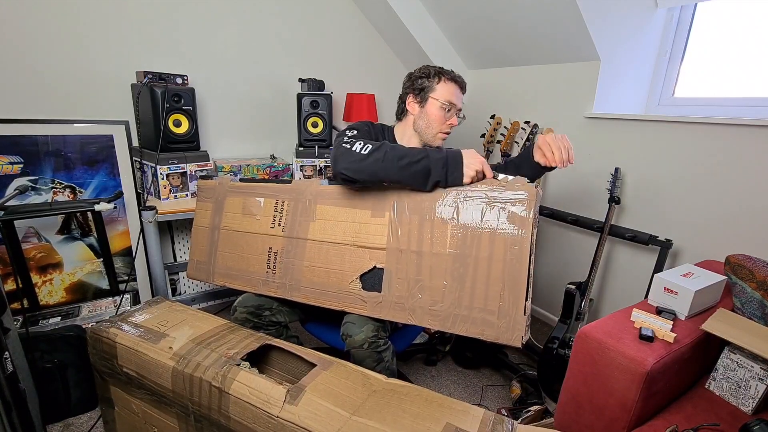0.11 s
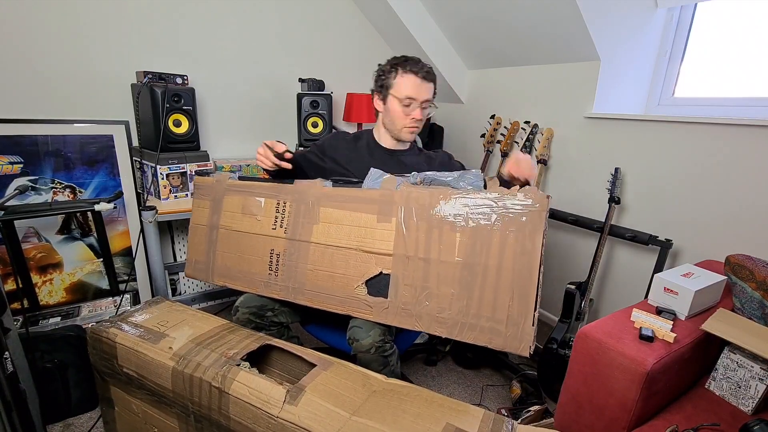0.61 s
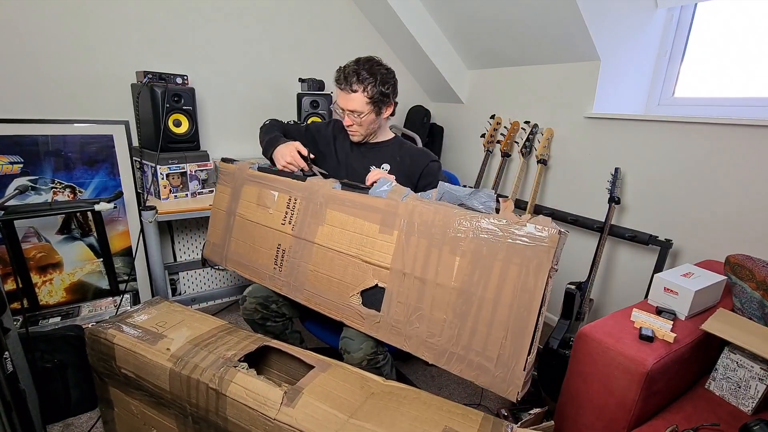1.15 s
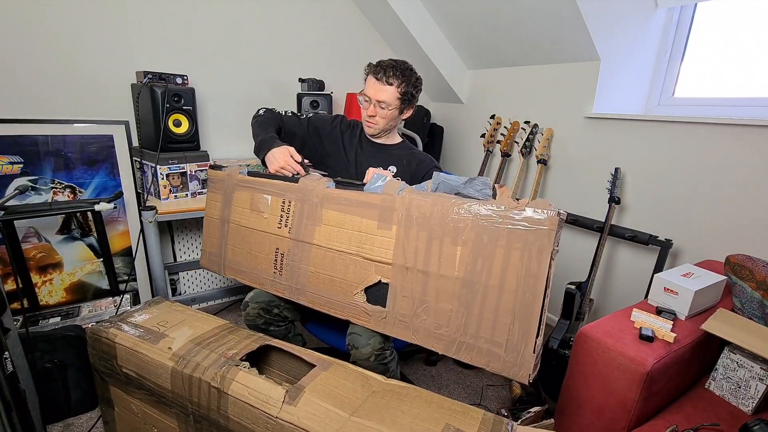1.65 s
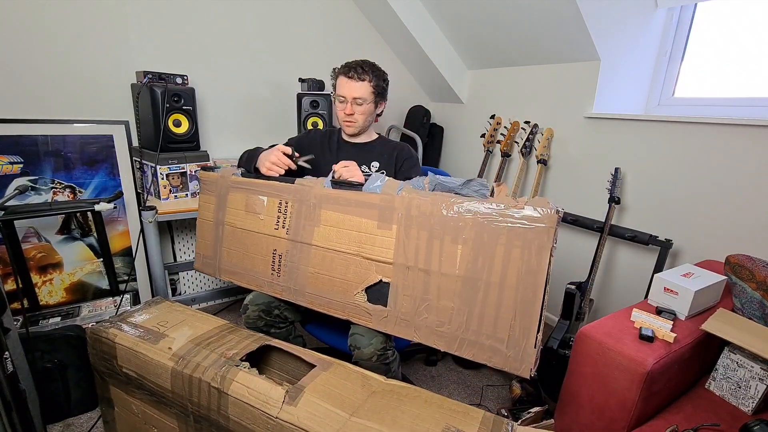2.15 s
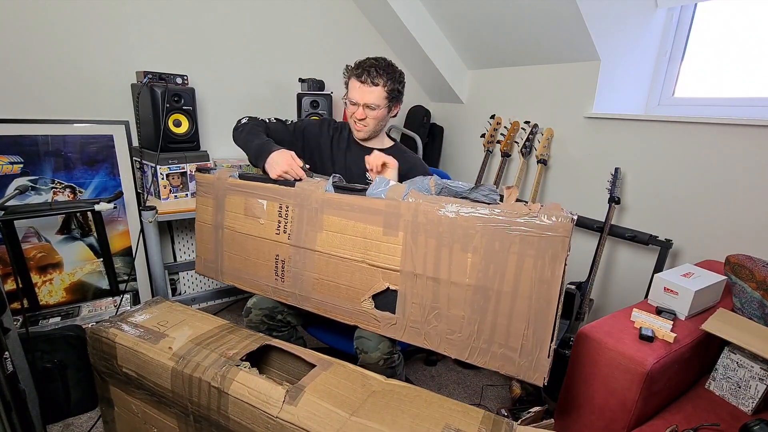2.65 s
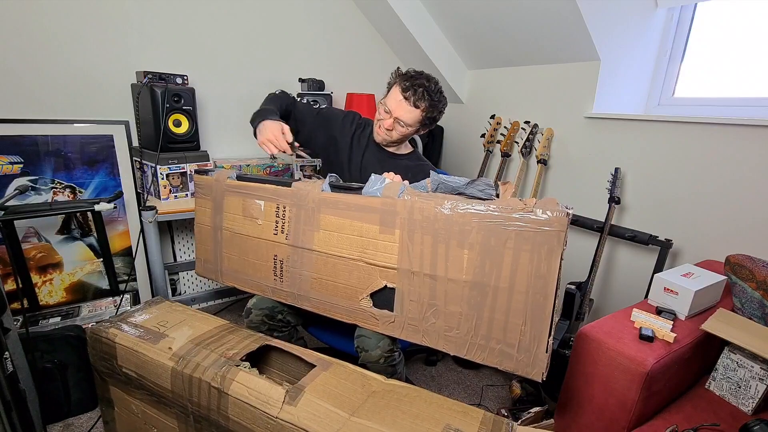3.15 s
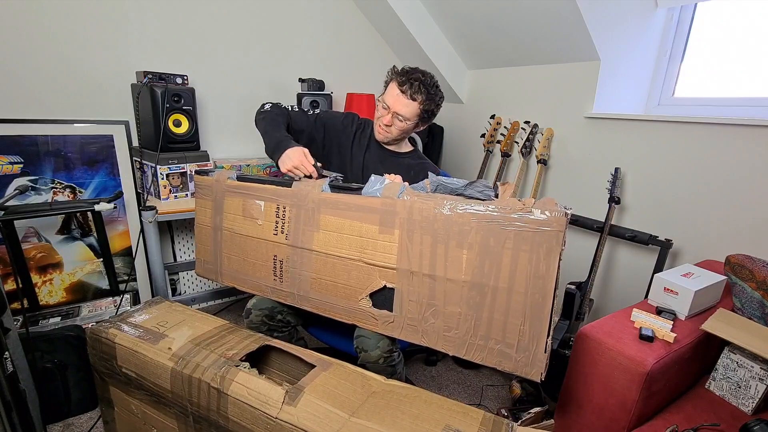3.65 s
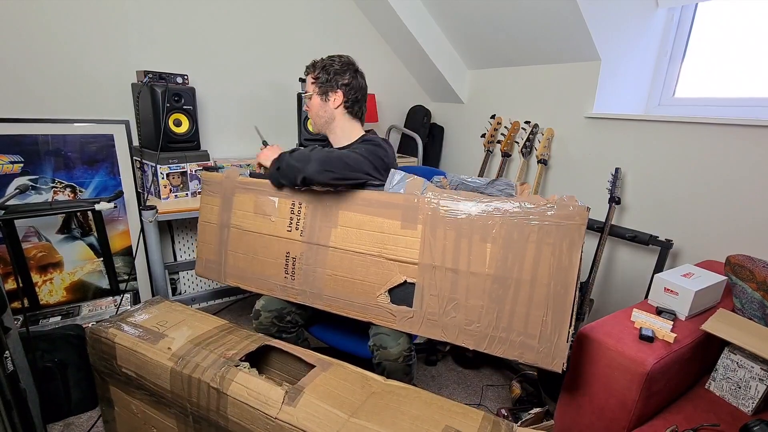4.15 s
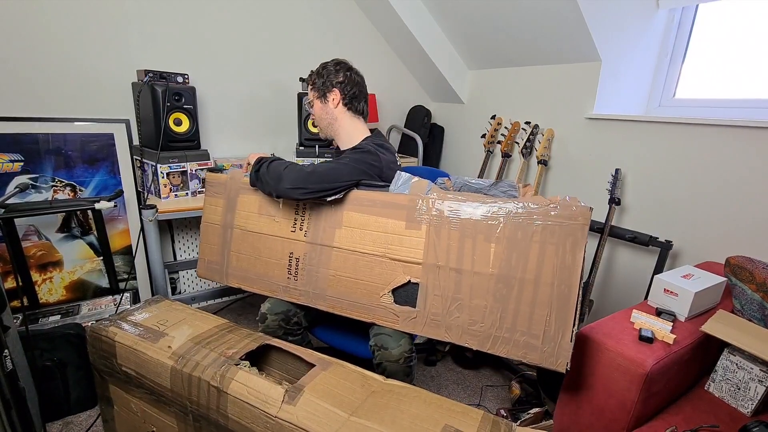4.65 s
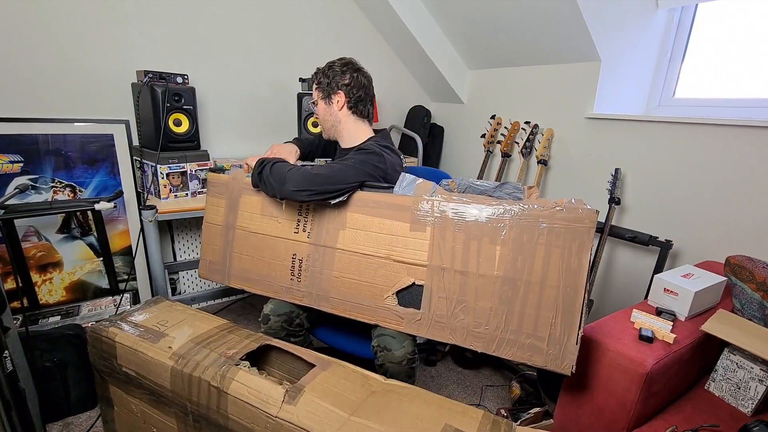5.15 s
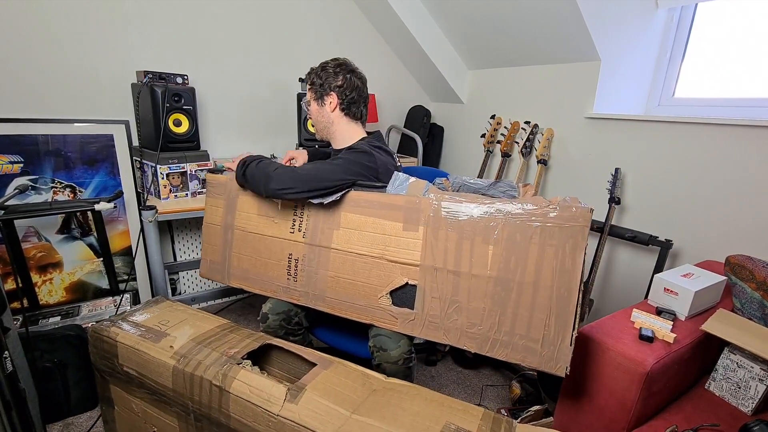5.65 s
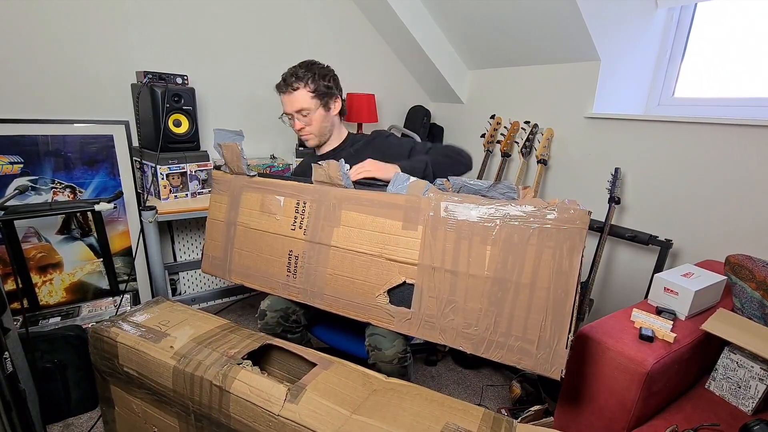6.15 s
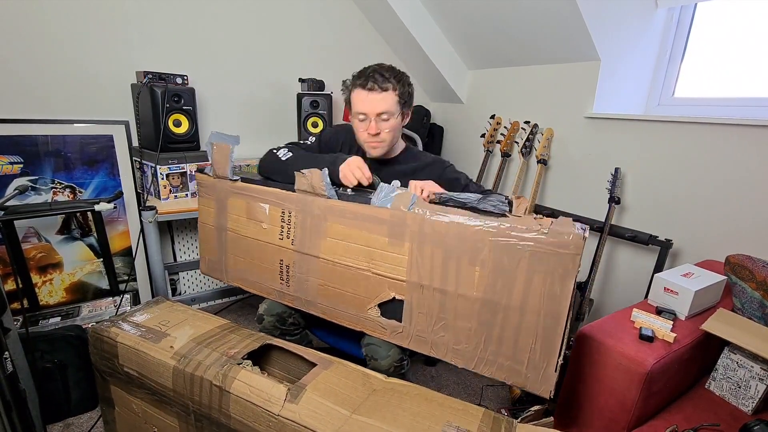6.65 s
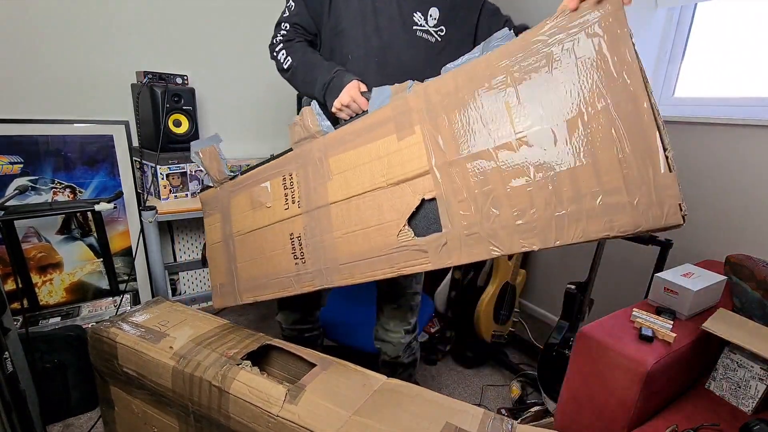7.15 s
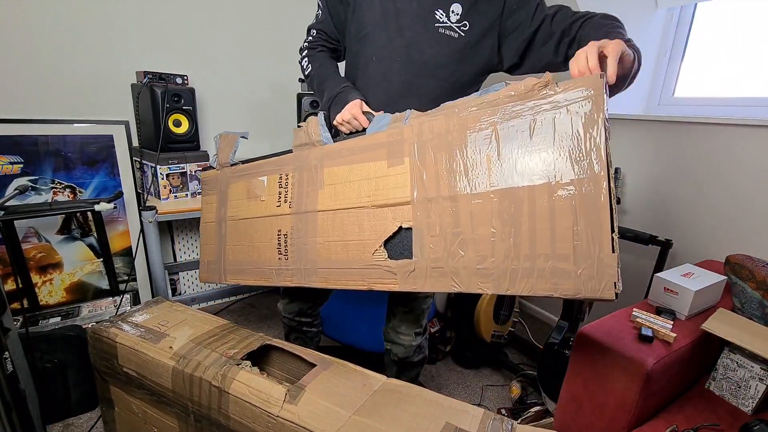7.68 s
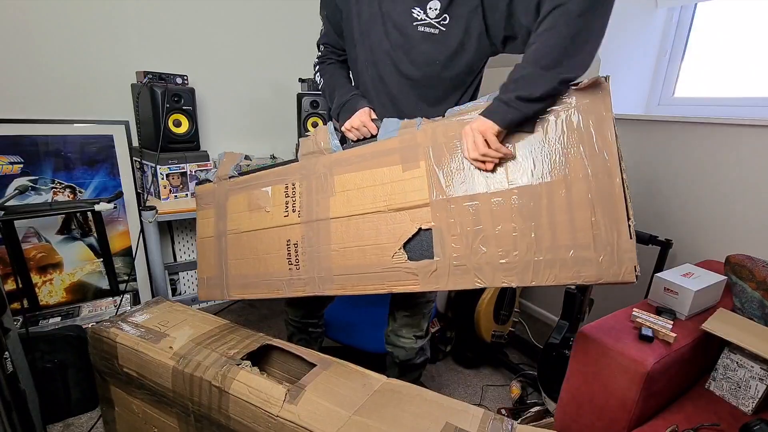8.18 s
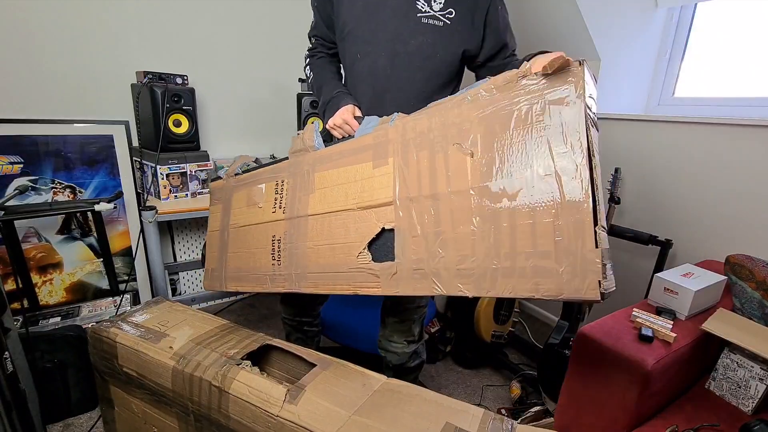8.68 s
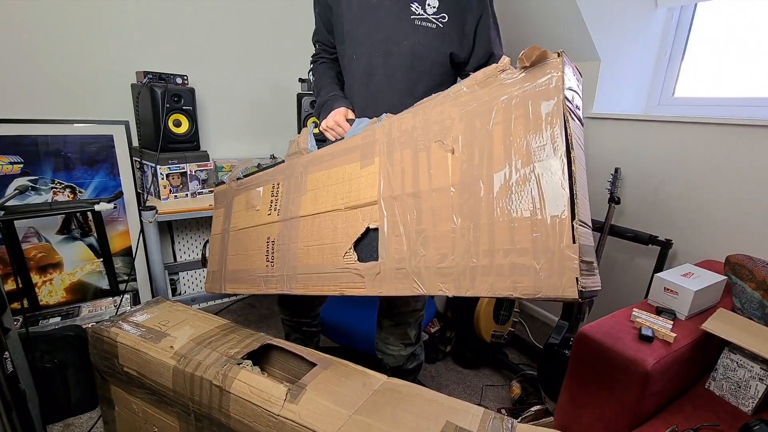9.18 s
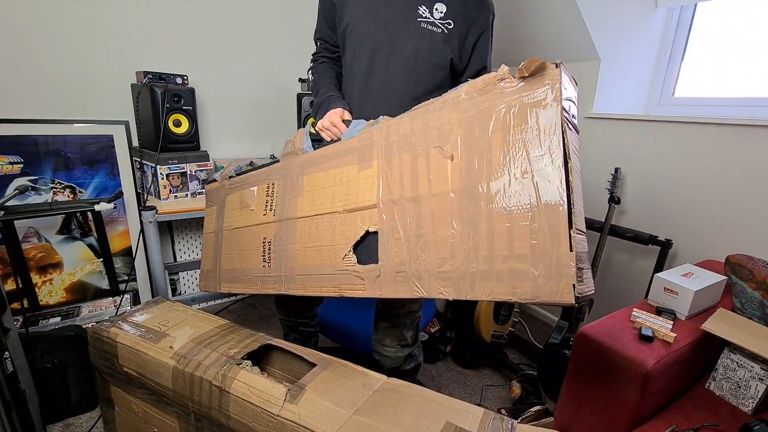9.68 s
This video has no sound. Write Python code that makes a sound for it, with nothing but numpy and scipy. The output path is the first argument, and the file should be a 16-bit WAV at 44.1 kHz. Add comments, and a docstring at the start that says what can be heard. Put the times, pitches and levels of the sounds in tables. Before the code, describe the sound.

A small furnished room with very faint tone and short, tight echoes; two spaced microphones near a large hollow cardboard box held on the knees. At 0.4 s a crisp tape snap with a hollow tap, then soft rubbing and small knocks from 0.7 to 1.7. A brief bright rustle swells at 2.1. Firm taps at 3.0 and 3.2, a low thump at 3.35, a dull knock at 3.5, then scratchy rubbing and tape ticks around 4. Quieter until stronger hollow knocks at 5.5 and 6.1, with snaps near 5.9. Handling and crackle rise from 6.7. At 7.35-7.5 the loudest event: a rapid cluster of sharp tape rips. More snaps from 7.8 lead to a heavy boxy knock and deep thud at 8.0. Smaller knocks until 8.6, sparse faint ticks, then crackling rustle and light taps from 9.6 to the end at 9.8.

```python
"""A small furnished room: a long cardboard box is cut open on someone's knees, heard by two spaced microphones.
Under a faint room tone, sleeves and fingers rustle over the board: clumped noise, ticking creases, creaking panels.
The box thuds on the legs as low dying sines, and hands knock its hollow panels, ringing eight modes.
Packing tape snaps and rips in short swarms of tiny breaks that ring the board and crackle in the tape.
Snaps, rips and knocks also get short echoes from feedback delays."""
import sys
import numpy as np
from scipy import signal
from scipy.fft import rfft, irfft, next_fast_len
from scipy.io import wavfile

SR = 44100
rng = np.random.default_rng(int(sys.argv[2]) if len(sys.argv) > 2 else 0)


def int16_out(signal):
    """Quantize to a 16-bit WAV file."""
    q = np.round(np.clip(np.atleast_2d(signal).T, -1, 1) * 32767)
    wavfile.write(sys.argv[1], SR, q.astype(np.int16))


def to_linear_factor(level_db):
    """Convert decibel levels (scalar or array-like) to linear amplitude factors."""
    exponent = np.asarray(level_db, float) / 20
    return 10 ** exponent


N = 432180   # samples, 9.8 s

# Modes of the hollow panels. Each row: pitch in Hz, relative level in dB, time to fall 60 dB in seconds.
PANEL_MODES = [(125, -14, 0.013), (190, -16.5, .035), (238, -7.5, 0.026), (300, 0.5, 0.031),
               (424, 5, 0.027), (496, 5, 0.032), (676, 1.5, 0.014), (900, -2.5, 0.005)]
PANEL_TOP_HZ, BOARD_TOP_HZ = 640, 3920   # edges between panel, board and tape sounds


def rms_one(x):
    """Scales a sound to an rms of 1."""
    return x / np.sqrt(np.mean(x ** 2) + 1e-20)


def band(x, kind, hz, order=2):
    """Butterworth filter: low, high or band."""
    return signal.sosfilt(signal.butter(order, hz, kind, fs=SR, output="sos"), x)


def add(out, x, s):
    """Mixes a short sound in at time s."""
    at = round(s * SR)
    x, at = x[max(-at, 0):], max(at, 0)
    out[at:at + len(x)] += x[:N - at]


def drift(rate_hz):
    """Slow random wander of rms 1: noise through two equal low-pass poles, one point every 40 samples."""
    pole = np.exp(-80 * np.pi * rate_hz / SR)
    noise = rng.standard_normal(N // 40 + 2002)
    slow = signal.lfilter([1], [1, -2 * pole, pole * pole], noise)[2000:]   # skips the settling
    return np.interp(np.arange(N) / 40, np.arange(len(slow)), rms_one(slow))


def grains(size, spread_db, alike):
    """Dense tiny breaks of very uneven size; each microphone hears a shared part and a scattered part."""
    sizes = to_linear_factor(spread_db * np.minimum(rng.exponential(1, size), 5))
    shared, left, right = rng.standard_normal((3, size))
    alike = np.clip(alike, 0, 1)
    scattered = np.array([left, right])
    return rms_one(sizes * (np.sqrt(alike) * shared + np.sqrt(1 - alike) * scattered))


def ring(x, hz, t60):
    """A two-pole resonance: a unit click sets a sine of height 1 ringing, down 60 dB after t60 seconds."""
    pole, turn = to_linear_factor(-60 / (t60 * SR)), 2 * np.pi * hz / SR
    return signal.lfilter([0, np.sin(turn)], [1, -2 * pole * np.cos(turn), pole * pole], x + 1e-18)


def rustle_noise(spread_db):
    """Grains in the rustle's colour, alike at both microphones in the lows and scattered in the highs."""
    # Each row: frequency in Hz, gain of the rustle in dB.
    colour_rows = [(15, -38), (25, -6.5), (102, -9.5), (223, -4), (354, -2), (480, -6.5), (988, -7),
                   (1290, -2.5), (2350, -5), (2990, -1.5), (14800, -15.5), (16000, -40.5)]
    hz, colour_db = np.transpose(colour_rows)
    f = np.arange(N // 2 + 1) * SR / N + 1
    colour = to_linear_factor(np.interp(np.log(f), np.log(hz), colour_db))
    alike = .97 / (1 + (f / 620) ** 2)      # long waves reach both microphones alike
    shared, own = rfft(grains(N, spread_db, alike=0.98)), rfft(grains(N, spread_db, alike=0))
    mixed = np.sqrt(alike) * shared + np.sqrt(1 - alike) * own
    return rms_one(irfft(mixed * colour, N))


def room_tone(level_db=-86.5):
    """Steady faint noise of the room, in the same colour as the rustle."""
    return to_linear_factor(level_db) * rustle_noise(spread_db=-6.0)


def creaks(per_s=90.0, lowest_hz=350):
    """As the box flexes, small slips come in spells and ring the upper panel modes."""
    chance = per_s * to_linear_factor(6 * drift(5.0)) / SR
    slips = rng.standard_normal(N) * (rng.random(N) < chance)
    return rms_one(sum(to_linear_factor(db) * ring(slips * rng.uniform(0.23, 1, N), hz, t60)
                       for hz, db, t60 in PANEL_MODES if hz > lowest_hz))


def ticks(per_s=250.0, cycles=4.6):
    """Creases flip one at a time: lone uneven ticks ring at one of ten pitches, each with its own offset in stereo."""
    sizes = to_linear_factor(5.4 * np.minimum(rng.exponential(1, N), 3)) * (rng.random(N) < per_s / SR)
    dealt, out = rng.integers(0, 10, N), np.zeros((2, N))
    for k, hz in enumerate(np.geomspace(700, 6000, 10)):
        tick = band(ring(sizes * (dealt == k), hz, cycles / hz), "low", hz) * np.sqrt(hz)
        right = np.roll(tick, rng.integers(-10, 10)) * rng.choice([-1, 1])   # samples early or late, maybe flipped
        out += [tick, right]
    return rms_one(out)


def rustle(tick_db=-7.5, creak_db=-6.5):
    """Rubbing comes in clumps; it shakes the panels, scuffs the board and crackles the tape."""
    # The box shifting, its panels shaking. Each row: time in seconds, level in dB before the lift below.
    shaking_rows = [(0.0, -74), (0.6, -75.5), (1.0, -63), (1.13, -61), (1.74, -80), (1.99, -64.5),
                    (2.45, -78), (2.59, -65.5), (3.19, -79), (3.6, -71.5), (4.07, -69.5), (4.34, -67.5),
                    (4.64, -79), (5.1, -65.5), (5.51, -63.5), (6.08, -73), (6.66, -70.5), (6.82, -63.5),
                    (8.24, -76), (8.43, -64.5), (8.68, -75), (8.74, -73.5), (9.55, -79.5), (9.8, -72)]
    # Hands and sleeves rubbing the board. Each row: time in seconds, level in dB before the lift below.
    rubbing_rows = [(0.0, -71), (0.68, -67), (0.84, -62.5), (1.91, -71), (2.1, -51.5), (2.34, -67.5),
                    (2.67, -66), (2.81, -71), (3.3, -72), (3.52, -74.5), (3.68, -68), (3.98, -55),
                    (4.45, -68.5), (5.08, -69.5), (5.65, -57), (6.41, -69), (6.69, -60), (6.79, -55.5),
                    (7.37, -55.5), (7.53, -69), (7.72, -72), (7.89, -62), (8.11, -67), (8.68, -66),
                    (9.47, -79.5), (9.61, -61.5), (9.75, -66), (9.8, -56)]
    # Loose tape crackling under the hands. Each row: time in seconds, level in dB before the lift below.
    crackle_rows = [(0.0, -73.5), (0.52, -70), (0.71, -63.5), (1.88, -79.5), (2.1, -50.5), (2.34, -81),
                    (2.62, -63), (3.41, -91), (3.96, -59), (4.15, -62), (4.34, -58), (4.39, -70.5),
                    (5.27, -80), (5.65, -62.5), (6.47, -67.5), (6.93, -56), (7.4, -60), (7.51, -69),
                    (9.61, -80), (9.72, -59), (9.8, -53)]
    lifted = ((shaking_rows, 10), (rubbing_rows, 2), (crackle_rows, 7))   # lifts in dB
    shake, rub, crackle = [to_linear_factor(lift_db + np.interp(np.arange(N) / SR, *np.transpose(rows)))
                           for rows, lift_db in lifted]
    tape_share = 0.31      # above the dull range the scuff partly follows the tape
    bright_scuff = to_linear_factor(0.5) * rub ** (1 - tape_share) * crackle ** tape_share

    out = to_linear_factor(tick_db) * rub * ticks() + to_linear_factor(creak_db) * shake * creaks()
    together = drift(15.0)      # clumping that all ranges share
    dull_top_hz = 1800
    parts = [(shake, "low", PANEL_TOP_HZ, 3.5), (rub, "band", [PANEL_TOP_HZ, dull_top_hz], 2.5),
             (bright_scuff, "band", [dull_top_hz, BOARD_TOP_HZ], 2.5), (crackle, "high", BOARD_TOP_HZ, 2.5)]
    for gain, kind, edge_hz, clump_db in parts:
        wander = np.clip(1.52 * together + 2.0 * drift(27.0), -5, 2)
        clumps = rms_one(to_linear_factor(clump_db * wander))
        out = out + rms_one(band(rustle_noise(spread_db=3.5), kind, edge_hz, order=3)) * clumps * gain
    return out


def thuds(t60=0.15, contact_s=0.005, lift_db=-5.5):
    """The whole box thuds on the legs: a low sine with a softened start that dies quickly."""
    # Each row: start in seconds, peak in dB before lift_db, pitch in Hz.
    thud_rows = [(0.914, -47, 88), (1.037, -48, 78), (2.406, -48, 62.5), (3.349, -32.5, 51.3),
                 (3.917, -44, 56.3), (5.005, -53, 46.4), (6.323, -40, 51.6), (6.39, -38, 69),
                 (7.075, -39, 53), (7.494, -41, 86.1), (7.738, -43, 61), (8.021, -33, 42)]
    out, t = np.zeros(N), np.arange(SR // 3) / SR
    for s, db, hz in thud_rows:
        swing = np.sin(2 * np.pi * hz * t) * to_linear_factor(-60 * t / t60) * (1 - np.exp(-t / contact_s))
        add(out, to_linear_factor(db + lift_db) * swing / np.abs(swing).max(), s)
    return out


def knocks(away_db_per_octave=13.0, bounce_s=0.00644, bounce_db=-6.5, contact_cycles=0.09, lift_db=5):
    """A soft contact and its rebound strike every panel mode, most those near the pitch of the spot struck."""
    # Hands on the hollow panels. Each row: start in seconds, peak in dB before lift_db,
    # pitch in Hz favoured by the spot struck.
    knock_rows = [(0.352, -37.5, 204), (0.396, -31, 237), (0.751, -40.5, 386), (0.938, -44, 353),
                  (1.049, -34.5, 374), (1.066, -42, 240), (1.081, -42, 240), (1.093, -36.5, 280),
                  (1.172, -42, 324), (1.216, -42.5, 206), (1.231, -45.5, 222), (1.479, -44, 430),
                  (1.546, -42.5, 178), (1.62, -48, 325), (1.679, -35, 285), (1.826, -46, 360),
                  (1.959, -45.5, 163), (2.044, -31, 350), (2.385, -51, 250), (2.421, -38, 290),
                  (2.477, -44.5, 267), (2.659, -47, 504), (2.709, -43, 348), (2.767, -44, 610),
                  (2.984, -33, 412), (3.179, -31.5, 493), (3.435, -48.5, 248), (3.462, -51, 280),
                  (3.491, -49, 300), (3.514, -32, 256), (3.529, -27, 300), (3.626, -42.5, 220),
                  (3.709, -39, 227), (3.844, -35.5, 300), (3.888, -43.5, 452), (4.023, -45, 242),
                  (4.384, -51, 320), (4.456, -47.5, 260), (4.478, -41, 404), (4.512, -47, 260),
                  (5.335, -47, 453), (5.481, -26, 283), (5.548, -37.5, 624), (5.66, -35, 450),
                  (5.884, -41, 420), (6.094, -25, 252), (6.105, -35, 282), (6.367, -30.5, 266),
                  (6.644, -34, 440), (6.791, -36, 440), (7.097, -36.5, 406), (7.147, -42.5, 202),
                  (7.35, -32, 500), (7.384, -32, 430), (7.419, -34, 447), (7.513, -44.5, 124),
                  (7.826, -35.5, 610), (7.945, -32.5, 450), (7.968, -29, 314), (8.012, -20, 220),
                  (8.274, -31, 243), (8.307, -39, 517), (8.589, -42.5, 324), (8.725, -46, 480),
                  (8.755, -45, 490), (8.771, -51, 476), (9.325, -42.5, 212), (9.604, -38.5, 382),
                  (9.692, -39, 303)]
    out, t = np.zeros(N), np.arange(SR // 6) / SR
    for s, db, spot_hz in knock_rows:
        luck = rng.normal(0, 1, (len(PANEL_MODES) + 1, 2))
        contact_s = contact_cycles / spot_hz      # low-pitched spots take a longer contact
        late = np.maximum(t - bounce_s * (1 + 0.21 * luck[-1, 0]), 0)
        rebound = to_linear_factor(bounce_db + 4.6 * luck[-1, 1]) * late ** 2 * np.exp(-late / contact_s)
        push = t ** 2 * np.exp(-t / contact_s) + rebound
        rings = np.zeros(len(t))
        for (hz, level_db, t60), (level_luck, pitch_luck) in zip(PANEL_MODES, luck):
            away_db = away_db_per_octave * abs(np.log2(hz / spot_hz))
            gain = to_linear_factor(level_db + 1.3 * level_luck - away_db)
            rings -= gain * ring(push, hz * (1 + 0.074 * pitch_luck), t60)
        rings = band(rings, "high", PANEL_MODES[0][0], order=3)      # knocks keep little sound below the lowest panel mode
        add(out, to_linear_factor(db + lift_db) * rings / np.abs(rings).max(), s)
    return out


def snaps(ring_db=-11.0, hump_db=-5.0, pan_spread_db=1.9):
    """Glue lets go in a swarm of breaks that swells and dies; it rings the board and crackles in the taut tape."""
    # Tape and board snapping, sudden start. Each row: peak time in seconds, board level in dB,
    # board resonance in Hz, tape level in dB, time to fade by half in ms (held to 1-18).
    snap_rows = [(0.032, -46.5, 3550, -46, 11.5), (0.224, -60, 3300, -44, 4.7),
                 (0.299, -37, 3680, -32, 6.8), (0.3528, -43.5, 1500, -67, 6),
                 (0.3977, -32.5, 3340, -22.5, 7.5), (0.675, -34.5, 1990, -42.5, 9.1),
                 (1.486, -37, 1550, -69, 3.3), (1.549, -41, 3160, -44, 13), (1.625, -49.5, 1300, -60, 4),
                 (1.684, -37.5, 1090, -60, 3.5), (1.9278, -44, 2440, -38, 4.9),
                 (2.013, -41.5, 2260, -46, 2.5), (2.0552, -31, 2300, -49, 8.3), (2.173, -51, 2530, -43, 12),
                 (2.259, -54, 1490, -49.5, 3.6), (2.519, -42, 3000, -80, 3.7), (2.666, -46, 1500, -52, 8.5),
                 (2.692, -51, 4360, -44.5, 22), (2.9875, -35.5, 1640, -44.5, 5.2),
                 (3.1809, -25, 990, -32, 9.7), (3.479, -49, 3130, -81, 9.8), (3.515, -44, 2620, -44.5, 9.8),
                 (3.564, -47.5, 2520, -45.5, 10), (3.632, -41.5, 1880, -43, 6),
                 (3.8308, -37, 1360, -58, 8.5), (3.8461, -31, 1420, -76, 2.6), (3.9, -30, 1860, -39, 4.6),
                 (4.012, -40, 1520, -41, 1.8), (4.167, -37, 1340, -61, 2.7), (4.282, -50.5, 1500, -64, 2.4),
                 (4.655, -46, 1700, -74, 5), (4.709, -43.5, 2230, -37, 7.1), (4.8613, -71, 2780, -43, 6.9),
                 (5.393, -47.5, 2240, -58, 5), (5.484, -29, 1700, -36, 9), (5.547, -31, 1800, -36, 12),
                 (5.881, -25.5, 1420, -35.5, 6.7), (6.035, -42, 1470, -79, 2.7),
                 (6.163, -35, 3200, -38.5, 8.3), (6.6489, -34.5, 1060, -74, 3.8),
                 (6.7591, -40, 1050, -42.5, 45), (6.804, -30.5, 3180, -30.5, 0.76),
                 (6.8906, -29.5, 3640, -39, 7.2), (7.077, -42.5, 3080, -47, 32), (7.3, -38, 1790, -36, 6),
                 (7.3159, -38.5, 4000, -31, 1.8), (7.3515, -14, 1380, -14.5, 1.7),
                 (7.3772, -36.5, 4000, -26.5, 0.87), (7.3845, -17, 3750, -15, 8.7),
                 (7.405, -23.5, 1560, -17.5, 19), (7.4222, -17, 1515, -22.5, 3.5),
                 (7.512, -25.5, 1400, -30, 3.5), (7.5151, -32.5, 1630, -55, 7),
                 (7.725, -61, 4400, -41, 1.3), (7.8273, -26, 1480, -49.5, 7),
                 (7.8401, -27.5, 1680, -27, 2.1), (7.96, -27, 1620, -31, 2.4),
                 (7.9943, -26.5, 2180, -31, 3), (8.0135, -20, 1800, -25.5, 12.7),
                 (8.2756, -36.5, 1030, -54, 3.7), (8.296, -35, 2940, -35.5, 6.1),
                 (8.31, -27, 1390, -45, 1.6), (8.491, -43, 1500, -44, 4), (8.851, -52, 3000, -49, 10),
                 (8.803, -61, 3400, -43.5, 5), (8.821, -46.5, 2500, -53.5, 1.7),
                 (8.8653, -43.5, 4870, -50.5, 21.5), (8.9262, -57, 3400, -40.5, 11),
                 (9.071, -54, 2050, -77, 4), (9.1243, -52, 835, -45.5, 9.3),
                 (9.2548, -47.5, 3600, -43.5, 22), (9.6717, -34.5, 2990, -32, 9.4)]
    # Short rips that swell before they fade. Each row: peak time in seconds, board level in dB,
    # board resonance in Hz, tape level in dB, time to fade by half in ms (held to 1-18).
    rip_rows = [(0.0635, -44.5, 796, -50.5, 7.1), (0.3145, -60, 3340, -42.5, 15),
                (0.805, -61, 3000, -50, 16), (0.854, -45, 2220, -53, 3.5), (1.014, -56, 1230, -80, 12),
                (1.16, -54, 3020, -74, 5.2), (1.2153, -75, 3380, -44.5, 7.2), (1.8268, -47, 3730, -52, 4.8),
                (2.59, -52, 2840, -69, 3.1), (2.795, -45, 4070, -43.5, 16), (3.17, -47.5, 1420, -72, 4.4),
                (3.383, -55.5, 3030, -70, 8.3), (3.72, -32.5, 1880, -44, 7.4),
                (3.7932, -33.5, 3180, -40.5, 4.9), (3.985, -51, 2500, -44.5, 18),
                (4.03, -39, 1540, -63, 11), (4.065, -48, 1520, -58, 4.4), (4.0984, -44, 1140, -62, 13),
                (4.21, -52, 2470, -47.5, 17), (4.4812, -47, 970, -58, 11.5), (4.605, -43, 1800, -51, 2.6),
                (4.7913, -40, 1790, -32.5, 7.2), (5.034, -50.5, 1860, -56.5, 15),
                (5.335, -54, 1490, -54, 12), (5.63, -41.5, 3100, -44, 9.1), (5.777, -45, 1400, -45, 16),
                (5.803, -45.5, 2020, -42.5, 5.7), (5.872, -33.5, 1010, -39, 6.5),
                (5.996, -40, 1510, -48, 2.7), (6.238, -38, 1800, -61, 3.4), (6.384, -46.5, 3000, -50, 6.5),
                (6.421, -45.5, 2950, -53, 6.9), (6.692, -39.5, 1730, -49, 13),
                (6.9043, -25, 2280, -29.5, 5), (7.267, -39, 3000, -38, 19), (7.354, -23, 2340, -24, 11.5),
                (7.503, -42, 1510, -44, 13.5), (7.68, -49, 4500, -49.5, 4.9), (7.815, -35, 2010, -33, 4.3),
                (7.9183, -31.5, 1320, -38.5, 2), (7.966, -25.5, 3320, -23.5, 9.1),
                (8.328, -41, 790, -42.5, 13.5), (8.5074, -29, 1040, -46, 5.9), (8.541, -48, 2020, -51, 7.9),
                (8.5936, -44.5, 2230, -39, 3.2), (8.999, -41, 1300, -49.5, 3.3),
                (9.21, -37.5, 3080, -34.5, 12), (9.3328, -45, 2850, -46, 7.8),
                (9.607, -31, 2700, -31.5, 16.1), (9.6968, -34, 3300, -26.5, 13.7),
                (9.7867, -43, 3200, -28, 2.1)]
    # Added to each row: swell in ms, powers of time in swell and fade (1 pointed, 2 rounded), opening break.
    rows = [(*row, 1.8, 1.1, 1.5, to_linear_factor(20)) for row in snap_rows]      # opens with one break 20 dB above the swarm
    rows += [(*row, row[-1], 1.6, 1.5, 0) for row in rip_rows]        # swells as slowly as it fades
    hump_ratio, ring_cycles = 1.35, 14      # the hump spans resonance / ratio to resonance * ratio
    out, t = np.zeros((2, N)), np.arange(-SR // 20, SR // 8) / SR
    for s, board_db, hz, tape_db, fade_ms, swell_ms, swell_shape, fade_shape, first in rows:
        away_ms = np.abs(t) * 1000
        halvings = np.where(t < 0, (away_ms / max(swell_ms, .3)) ** swell_shape,
                            (away_ms / np.clip(fade_ms, 1, 18)) ** fade_shape)
        # The swarm stutters by 4 dB, at a pace below 350 Hz.
        lumps = to_linear_factor(4 * rms_one(band(rng.standard_normal(len(t)), "low", 350)))
        swarm = rms_one(grains(len(t), spread_db=3.0, alike=0.68) * lumps) + first * (t == 0)

        board = rms_one(band(band(swarm, "high", PANEL_TOP_HZ, order=3), "low", BOARD_TOP_HZ))
        hump = rms_one(band(board, "band", [hz / hump_ratio, hz * hump_ratio]))
        ringing = rms_one(ring(board, hz, ring_cycles / hz))
        board = rms_one(board + to_linear_factor(hump_db) * hump + to_linear_factor(ring_db) * ringing)
        tape = rms_one(band(band(swarm, "high", 2220), "low", 8500, order=1))
        both = (to_linear_factor(board_db) * board + to_linear_factor(tape_db) * tape) * .5 ** halvings

        lag_s = rng.normal(0.1, 0.24) / 1000      # the path to each microphone differs; left is mostly later
        pan_db = rng.normal(0, pan_spread_db)
        add(out[0], both[0] * to_linear_factor(pan_db / 2), s + t[0] + lag_s / 2)
        add(out[1], both[1] * to_linear_factor(-pan_db / 2), s + t[0] - lag_s / 2)
    return out


def room(x, t60=0.063):
    """Echoes of the small room: six feedback delays a side, dying over t60 seconds."""
    size = next_fast_len(N + SR)
    bins = np.arange(size // 2 + 1)
    echo = np.zeros((2, len(bins)), complex)
    for k, lag in enumerate((rng.uniform(0.0044, 0.016, 12) * SR).astype(int)):
        loop = to_linear_factor(-60 * lag / SR / t60) * np.exp(-2j * np.pi * lag * bins / size)
        echo[k % 2] += loop / (1 - loop) * (-1) ** (k // 2)
    return irfft(rfft(x, size) * echo, size)[:, :N]


def scene():
    """Knocks and snaps get the room's echoes; thuds, rustle and room tone stay dry."""
    background = room_tone() + rustle() + thuds()
    blows = knocks() * to_linear_factor([[-.3], [.3]]) + snaps()      # knocks lean slightly right
    return background + blows + to_linear_factor(-7) * room(blows.mean(axis=0))


def roll_off(x):
    """The treble ends steeply here."""
    return signal.sosfilt(signal.butter(12, 16850, fs=SR, output="sos"), x)


def record(dry):
    """The highest peaks are rounded off and the very top is cut."""
    rounded = 0.72 * np.tanh(dry / 0.87)
    top_cut = signal.cheby2(10, 35, 1.03 * 16000, fs=SR, output="sos")      # 35 dB down from 16480 Hz up
    mix = signal.sosfilt(top_cut, rounded)
    return roll_off(mix)


dry = scene()
out = record(dry)
int16_out(out)
```